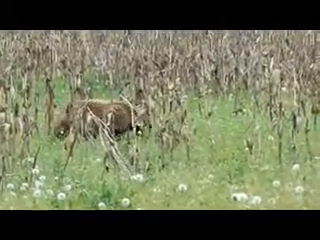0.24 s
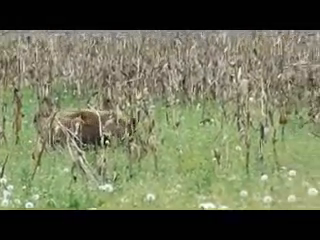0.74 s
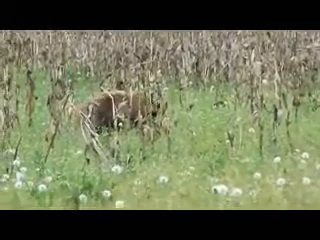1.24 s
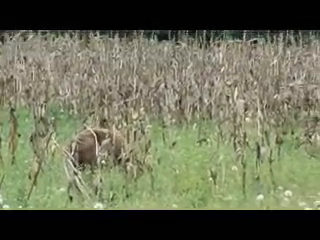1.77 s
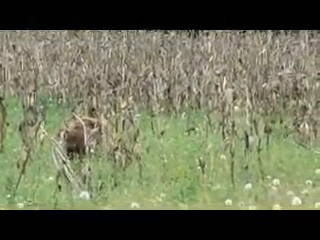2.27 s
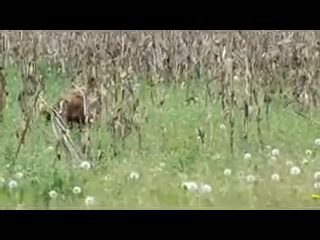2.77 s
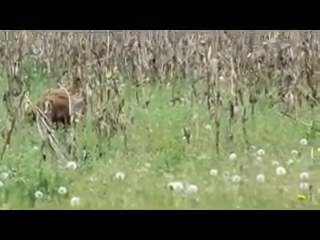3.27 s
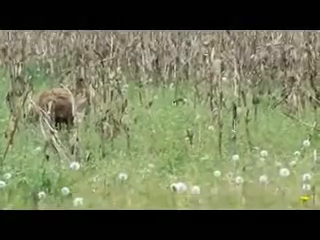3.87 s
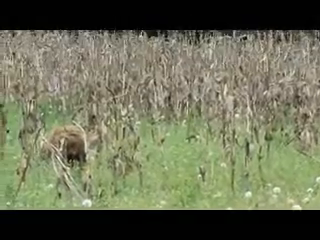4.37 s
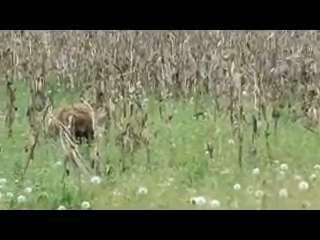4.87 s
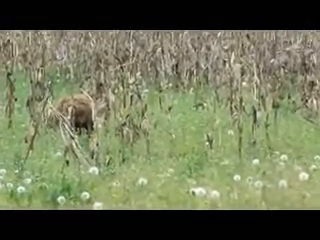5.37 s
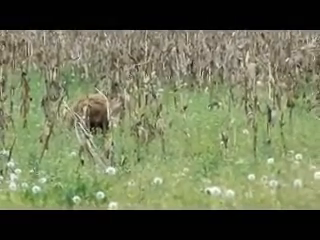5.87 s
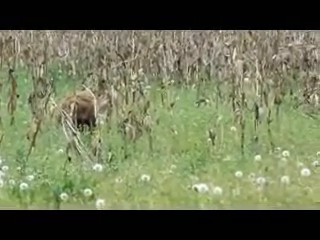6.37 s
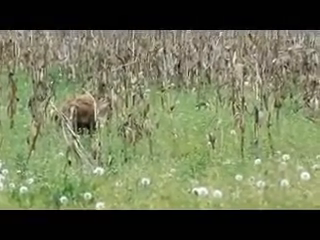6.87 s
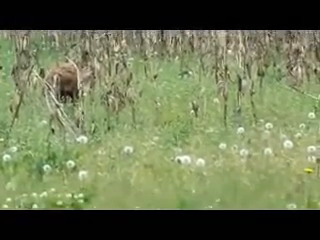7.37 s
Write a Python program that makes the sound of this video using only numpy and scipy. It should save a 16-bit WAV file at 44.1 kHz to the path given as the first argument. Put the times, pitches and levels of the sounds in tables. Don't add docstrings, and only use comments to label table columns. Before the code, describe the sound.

Outdoors beside a dry crop field, two far engines drone low while leaves rustle under a steady hiss. A cricket gives two early chirps, pauses, then chirps regularly, each a quick burst of three bright falling pulses. Wind puffs thump the handheld stereo microphone, hardest around three and a half to four seconds. Thin bird whistles come from far off.

```python
import sys
import numpy as np
from scipy import signal
from scipy.fft import rfft, irfft, next_fast_len
from scipy.io import wavfile
from scipy.ndimage import uniform_filter1d, map_coordinates

SR = 44100
rng = np.random.default_rng(int(sys.argv[2]) if len(sys.argv) > 2 else 0)


def put_to_file(sound):
    columns = np.atleast_2d(sound).T
    safe = np.clip(columns, -1, 1)
    whole_steps = np.round(safe * 32767)
    wavfile.write(sys.argv[1], SR, whole_steps.astype(np.int16))


def nominal_scale(level):
    x = np.asarray(level, float) / 20
    return 10 ** x


N = 336042


def unit(x):
    return x / np.sqrt(np.mean(x ** 2) + 1e-20)


def along(points, hz):
    f, v = np.transpose(points)
    return np.interp(np.log(hz + 1), np.log(f + 1), v)


def curves(rows, t=None):
    s, *columns = np.transpose(rows)
    if t is None:
        t = np.arange(N) / SR
    return [np.interp(t, s, column) for column in columns]


def wobble(rate_hz):
    at = np.arange(0, N + 32, 32)
    knots = rng.standard_normal(int(N * rate_hz / SR) + 4)
    return np.interp(np.arange(N), at, map_coordinates(knots, [at * rate_hz / SR]))


def filtered(x, response):
    m = next_fast_len(N + 8192)
    return irfft(rfft(x, m) * response(np.fft.rfftfreq(m, 1 / SR)), m)[..., :N]


def coloured(shape, points):
    return filtered(rng.standard_normal(shape), lambda hz: nominal_scale(along(points, hz)))


def add(track, start_s, sound):
    part = track[round(start_s * SR):][:len(sound)]
    part += sound[:len(part)]


def smooth_patches(shape, bands, frames):
    noise = uniform_filter1d(rng.standard_normal(shape), size=bands, axis=0)
    return unit(uniform_filter1d(noise, size=frames, axis=1))


def patchy(x, depth_db):
    z = signal.stft(x, nperseg=512)[2]
    gain_db = depth_db * smooth_patches(z.shape[1:], bands=6, frames=30)
    return signal.istft(z * nominal_scale(gain_db), nperseg=512)[1][..., :N]


def whistle(rows, squeeze=1, detune=1, octave_db=-80):
    t = np.arange(rows[0][0], rows[-1][0], squeeze / SR)
    hz, db = curves(rows, t)
    phase = 2 * np.pi * (np.cumsum(hz * detune) / SR + rng.random())
    fade = np.minimum(1, np.minimum(t - t[0], t[-1] - t) / 0.00084)
    return t[0] / squeeze, nominal_scale(db) * fade * (np.sin(phase) + nominal_scale(octave_db) * np.sin(2 * phase))


def scattered(x):
    t60_s, echo_db = .1, -16
    t = np.arange(SR // 8) / SR
    tail = rng.standard_normal(len(t)) * nominal_scale(-60 * t / t60_s) * (t > .004)
    return x + nominal_scale(echo_db) * signal.oaconvolve(x, tail / np.linalg.norm(tail))[:N]


# start_s, rustle_db
BREEZE = [(0.0, -44), (.1, -45.5), (1.9, -46), (2.2, -45), (2.5, -46.5), (2.85, -45.5), (3.2, -46),
          (3.8, -46), (4.2, -45.5), (4.6, -45), (6.3, -44), (7.62, -44.5)]
# freq_hz, level_db (per Hz)
RUSTLE_COLOUR = [(200, -17), (420, -11), (650, -9.5), (1000, -8), (1400, -9), (2200, -14.5), (3500, -17),
                 (4500, -21.5), (6000, -33), (9900, -120)]
# freq_hz, level_db (per Hz)
HISS_COLOUR = [(2500, -25), (3500, -16), (4500, -4), (5500, -2.5), (6500, -5), (8000, -6), (11500, -8.5),
               (13000, -20)]
# freq_hz, likeness (0 to 1)
RUSTLE_LIKENESS = [(200, .49), (800, .7), (1200, .45), (1600, .6), (2200, .36), (2600, .23), (3600, .18),
                   (4500, .3)]
# freq_hz, lead_rad
LEFT_LEAD = [(500, .1), (1200, .1), (1550, .35), (2240, .62), (2600, 1.16), (3300, 1.2), (3700, .7),
             (4200, .2)]


def field():
    breeze_db, = curves(BREEZE)
    spread = lambda hz: np.arccos(np.clip(along(RUSTLE_LIKENESS, hz), -1, 1)) / 2
    mid, side = filtered(
        rng.standard_normal((2, N)),
        lambda hz: nominal_scale(along(RUSTLE_COLOUR, hz)) * [np.cos(spread(hz)), np.sin(spread(hz))])
    pair = np.array([mid + side, mid - side])
    pair = filtered(pair, lambda hz: np.exp(.5j * along(LEFT_LEAD, hz) * [[1], [-1]]))
    rustle = unit(patchy(pair, depth_db=0.82)) * nominal_scale([[-.4], [.4]])
    mid, side = coloured((2, N), HISS_COLOUR)
    side = nominal_scale(-3.5) * side
    hiss = unit(np.array([mid + side, mid - side]))
    hiss_db = -11.5 + 4
    return (nominal_scale(breeze_db + 3.0 + 0.22 * wobble(7)) * rustle
            + nominal_scale(breeze_db + hiss_db + 0.16 * wobble(12.0)) * hiss)


# start_s, level_db
MURMUR_SWELL = [(0, -42), (.5, -58.5), (1, -50.5), (1.4, -43.5), (1.9, -47.5), (2.4, -50.5), (2.75, -43),
                (3.1, -48), (4.3, -50), (4.9, -54), (5.5, -56), (6, -41), (6.4, -55), (7.1, -49.5),
                (7.62, -49.5)]
# freq_hz, level_db (per Hz)
MURMUR_COLOUR = [(60, -30), (190, -8.5), (300, 5.5), (500, -7), (900, -7), (1500, -49)]


def murmur():
    mid, side = coloured((2, N), MURMUR_COLOUR)
    roar = unit(np.array([mid + 0.077 * side, mid - 0.097 * side]))
    return nominal_scale(curves(MURMUR_SWELL)[0] + 2.2 * wobble(8)) * roar


def engine(firing_hz, db, orders, sway_db):
    phase = 2 * np.pi * np.cumsum(firing_hz * (1 + 0.0018 * wobble(2.993))) / SR
    drone = np.zeros(N)
    for order, order_db in orders:
        level = nominal_scale(db + 2.0 + order_db + sway_db * wobble(7))
        drone += level * np.sin(order * phase + 2 * np.pi * rng.random())
    return drone


# start_s, firing_hz, level_db
FAR_ENGINE = [(0, 24.3, -18), (.8, 23.66, -18.5), (1.3, 23.32, -18), (1.6, 23.1, -18), (2.1, 22.7, -21.5),
              (2.75, 22.28, -26.5), (3.6, 21.6, -27), (4.55, 21.12, -29), (5.1, 21.02, -29),
              (5.5, 21.02, -28), (6.3, 20.96, -30.5), (6.8, 20.8, -30), (7.62, 20.58, -31.5)]
# order (multiple of firing rate), level_db
FAR_ENGINE_ORDERS = [(2, -18), (3, -18.5), (4, -19.5), (5, 0), (6, -7), (7, -21.5), (8, -21.5), (9, -30.5),
                     (10, -29.5), (12, -35.5)]
# start_s, firing_hz, level_db, growl_db (extra on orders 3 and 4)
STEADY_ENGINE = [(0, 30.7, -34.5, -28), (.8, 30.29, -27.5, -17), (1.3, 30.2, -28.5, -24),
                 (1.6, 29.93, -27, 16), (2.75, 29.4, -27.5, 9.5), (3.6, 28.89, -27, 9.5),
                 (4.55, 28.41, -28, 3), (5.1, 28.25, -30, 10), (5.5, 28.04, -30.5, 8),
                 (6.3, 28.49, -30.5, 6), (6.8, 28.89, -32.5, 14), (7.62, 29.48, -34.5, 3)]
# order (multiple of firing rate), level_db
STEADY_ENGINE_ORDERS = [(2, -5.5), (3, -18), (4, -12.5), (5, 1), (6, -6), (7, -15.5), (8, -17), (9, -25),
                        (10, -24)]


def engines():
    far = engine(*curves(FAR_ENGINE), FAR_ENGINE_ORDERS, sway_db=1.1)
    hz, db, growl_db = curves(STEADY_ENGINE)
    orders = [(k, level + growl_db * (k in (3, 4))) for k, level in STEADY_ENGINE_ORDERS]
    near = engine(hz, db, orders, sway_db=1.6)
    return far * nominal_scale([[-.6], [.6]]) + near * nominal_scale([[-.8], [.8]])


def steady(x, size):
    return x / np.sqrt(np.abs(uniform_filter1d(x ** 2, size)) + 0.018)


# freq_hz, level_db (per Hz)
BUFFET_COLOUR = [(15, -11), (30, -1.5), (60, 3.5), (110, -1.5), (180, -12.5), (300, -25), (500, -43),
                 (900, -88)]
# freq_hz, level_db (per Hz)
THUMP_COLOUR = [(20, -17), (60, 2.5), (110, 2), (170, 6), (250, -3), (400, -16), (600, -36.5), (900, -73)]
# freq_hz, level_db (per Hz)
SNAP_COLOUR = [(200, -30), (350, 0), (600, 0), (800, -8), (1000, -22), (1300, -50), (2000, -90)]


def port(gust_db, thumps):
    snap_part_db, fizz_part_db, spike_part_db = -1, -13, 15
    lumps = steady(nominal_scale(5.2 * wobble(18)) * unit(coloured(N, BUFFET_COLOUR)), size=6000)
    dull, bright, spikes = np.zeros((3, N))
    t = np.arange(-1500, 1500) / SR
    snap = irfft(nominal_scale(along(SNAP_COLOUR, np.fft.rfftfreq(len(t), 1 / SR))), len(t))
    snap = np.fft.fftshift(snap)
    suction = .2 * np.exp(-(t / .0045) ** 2) - np.exp(-(t / .0009) ** 2)
    spike = nominal_scale(spike_part_db) * suction - nominal_scale(snap_part_db) * snap / snap.max()
    for s, db, bright_db in thumps:
        add(dull, s + t[0], nominal_scale(db + 4.5) * np.exp(-(t / 0.01) ** 2))
        add(bright, s + t[0], nominal_scale(db + bright_db + fizz_part_db) * np.exp(-(t / 0.0065) ** 2))
        add(spikes, s + t[0], nominal_scale(db + bright_db) * spike)
    body = dull * steady(unit(coloured(N, THUMP_COLOUR)), size=500)
    fizz = bright * steady(unit(coloured(N, SNAP_COLOUR)), size=300)
    return nominal_scale(gust_db + 1.53) * lumps + body + fizz + spikes


# peak_s, left_db, right_db
WIND_PUFFS = [(0.05, -22.5, -36), (0.18, -34, -22.5), (0.93, -39, -42), (1.8, -34, -20.5),
              (2.06, -23, -19.5), (2.19, -21, -16), (2.33, -33, -17.5), (2.46, -23, -24.5),
              (2.66, -28, -41), (3.08, -30, -18), (3.2, -24, -20.5), (3.45, -24, -13), (3.68, -37, -12.5),
              (3.82, -26, -21), (3.95, -37, -13), (4.08, -27, -22), (4.78, -24.5, -25.5), (5.08, -26, -26),
              (5.42, -19.5, -35), (5.81, -16.5, -16.5), (6.17, -18.5, -23.5), (6.33, -21.5, -21.5),
              (6.47, -23, -27.5), (6.68, -23, -24), (7.1, -27, -22.5), (7.28, -20, -30), (7.56, -21.5, -23)]
# peak_s, level_db, brightness_db
LEFT_EDDIES = [(2.129, -35, -24), (2.146, -25, -18), (2.446, -36, -26), (3.075, -25, 3), (3.094, -38, -6),
               (3.107, -21, 3), (3.114, -29, -5), (3.856, -40, -18), (3.866, -23, -17), (3.869, -14, -6),
               (3.885, -14, -16), (3.888, -16.5, -13), (3.898, -11.5, -9), (4.005, -18.5, -10),
               (4.847, -33, -26), (5.026, -28.5, -29), (5.413, -28, -20), (5.669, -24, -31),
               (5.783, -19, -27), (6.144, -38, 0), (6.737, -29.5, -23), (7.607, -22, -29)]
# peak_s, level_db, brightness_db
RIGHT_EDDIES = [(1.682, -26, -22), (1.817, -24.5, -14), (1.991, -22, -7), (2.018, -24, -26),
                (2.042, -18, -29), (2.164, -19.5, -20), (2.193, -16, -12), (2.211, -15, -16),
                (2.308, -18.5, -12), (3.077, -21, -9), (3.105, -18, -15), (3.177, -14.5, -14),
                (3.387, -18.5, -26), (3.405, -27, -25), (3.468, -14, -2), (3.529, -20.5, -26),
                (3.573, -26.5, -23), (3.63, -13, -2.5), (3.641, -14.5, -9), (3.676, -26, -24),
                (3.705, -17, -27), (3.722, -18, -20), (3.788, -26.5, -3), (3.853, -19, -10),
                (3.879, -10, -6), (3.896, -13, -25), (3.912, -11, -32), (4.035, -12.5, -14),
                (4.04, -14.5, -20), (4.048, -16.5, -7), (4.062, -24, -14), (4.089, -30, -8),
                (4.167, -22.5, -25)]


def wind():
    rise_db_s, fall_db_s, calm_db = 78, 73, -45
    peak_s, *port_levels_db = np.transpose(WIND_PUFFS)
    late_s = np.arange(0, N, 64)[:, None] / SR - peak_s
    shape_db = np.minimum(rise_db_s * late_s, -fall_db_s * late_s)
    gusts_db = []
    for db in port_levels_db:
        loudest_db = np.maximum(calm_db, (shape_db + db).max(1))
        gusts_db.append(np.repeat(loudest_db, 64)[:N])
    return np.array([port(gusts_db[0], LEFT_EDDIES), port(gusts_db[1], RIGHT_EDDIES)])


# start_s, level_db
STALK_TICKS = [(4.138, -44), (4.91, -40), (5.548, -31), (7.136, -45), (7.428, -45)]


def ticks():
    track, t = np.zeros(N), np.arange(200) / SR
    for s, db in STALK_TICKS:
        add(track, s, nominal_scale(db - 60 * t / 0.0073) * rng.standard_normal(len(t)))
    return filtered(track, lambda hz: hz ** 2 / (hz ** 2 + 3500 ** 2))


# start_s, length_s, from_hz, to_hz, level_db
BIRD_GLIDES = [(0.328, .035, 3400, 3420, -57), (.4, .16, 3530, 3830, -56), (.57, .1, 3860, 4020, -59),
               (.58, 0.56, 512, 510, -55.5), (.385, .07, 2630, 2680, -59), (.5, .13, 2790, 2950, -54.5),
               (.935, .065, 3540, 3740, -56), (1.0, .07, 3760, 4050, -60), (3.657, .022, 3100, 3050, -54),
               (3.95, .03, 4600, 3970, -53), (4.52, 0.027, 2900, 3900, -58), (4.55, .04, 6050, 6580, -58),
               (4.718, .037, 6300, 6720, -48), (4.91, .04, 3000, 3300, -56), (4.985, .03, 3900, 4650, -57),
               (5.008, .03, 4600, 5050, -53), (5.052, .014, 6700, 5700, -50),
               (5.066, .012, 5000, 4200, -57), (5.825, .035, 3650, 3280, -54),
               (5.87, .025, 4760, 4600, -52), (5.866, 0.027, 3020, 2840, -53),
               (5.925, .045, 3300, 3650, -54), (5.97, .035, 3640, 3720, -57), (5.94, .02, 5650, 5100, -53),
               (6.19, .03, 4950, 3950, -53.5), (6.322, 0.033, 4900, 4150, -54),
               (6.083, .025, 4700, 4150, -56), (6.378, 0.026, 2870, 2950, -53),
               (6.545, .04, 5200, 4150, -57), (7.5, .05, 3850, 4000, -56), (7.448, 0.12, 2740, 3000, -56),
               (7.452, .028, 3610, 3730, -53), (7.4, .04, 3500, 3580, -56)]
# offset_s (from its lowest point), pitch_hz, level_db
SWOOP_SHAPE = [(-.103, 5850, -13), (-.082, 6250, -6), (-.066, 6400, 3), (-.057, 5800, -6),
               (-.022, 4050, -2), (0, 3230, -11), (.013, 4150, 0), (.028, 5100, -5), (.037, 5500, -14)]
# lowest_s, level_db, crest_db (extra on the high crest)
BIRD_SWOOPS = [(5.244, -49, 1), (5.432, -48, 1.5), (5.615, -51.5, -6)]


def birds():
    glides, swoops = np.zeros((2, N))
    swell = [(0, -7), (.35, 0), (1 - .35, 0), (1, -7)]
    for s, length, from_hz, to_hz, db in BIRD_GLIDES:
        rows = [(s + u * length, from_hz + u * (to_hz - from_hz), db + less_db) for u, less_db in swell]
        add(glides, *whistle(rows))
    for s, db, crest_db in BIRD_SWOOPS:
        rows = [(u, hz, less_db + crest_db * (hz > 5800)) for u, hz, less_db in SWOOP_SHAPE]
        start, tone = whistle(rows)
        add(swoops, s + start, nominal_scale(db) * tone)
    return glides * nominal_scale(3 + 1.9 * wobble(70)) + swoops * nominal_scale(3 + 1.9 * wobble(140))


# offset_s (from peak), pitch_hz, level_db
OPENING_STROKE = [(-.007, 5750, -20), (-.004, 5620, -2), (0, 5450, 0), (.004, 5200, 0), (.007, 4950, -18)]
# offset_s (from peak), pitch_hz, level_db
LOUD_STROKE = [(-.015, 5570, -38), (-.0105, 5704, -9.5), (-.006, 5730, -3), (-.002, 5720, -1),
               (0, 5730, -0.5), (.002, 5560, -3), (.0048, 5300, -7), (.0085, 4960, -14.5),
               (.012, 4660, -33)]
# peak_s, level_db
CHIRP_OPENINGS = [(.381, -42), (.831, -48), (2.119, -53), (2.517, -57), (2.813, -39), (3.135, -48),
                  (3.456, -45), (3.691, -50), (3.918, -51), (4.389, -50), (4.624, -49), (4.85, -43),
                  (5.252, -44), (5.466, -47), (5.712, -43), (6.065, -43), (6.351, -43), (6.568, -46),
                  (6.83, -42), (7.033, -44), (7.332, -43), (7.579, -46)]
# onset_s, peak_db, length_s, tail_db (under the peak)
CHIRP_STROKES = [(0.4003, -34.5, 0.0097, -2.2), (0.434, -31, 0.014, -9.5), (0.4683, -30.5, 0.0151, -11.3),
                 (0.85, -34.7, 0.0136, -9.3), (0.8822, -34.1, 0.01, -7.0), (0.918, -34.1, 0.014, -8.0),
                 (2.14, -34, 0.012, -6.5), (2.1689, -33.5, 0.012, -4.6), (2.2054, -32.5, 0.0141, -7),
                 (2.5368, -35.6, 0.0144, -9.3), (2.5688, -33, 0.013, -11.4), (2.6031, -33.0, 0.016, -13.6),
                 (2.8305, -32, 0.011, -3.2), (2.8663, -29, 0.012, -8), (2.9005, -32.1, 0.015, -8.5),
                 (3.1554, -34.5, 0.0111, -12.7), (3.1878, -35, 0.0106, -6.4), (3.2236, -34.5, 0.0101, -6.9),
                 (3.4742, -39.0, 0.0144, -4), (3.5085, -35.7, 0.0102, -4.9), (3.5441, -36, 0.015, -10.0),
                 (3.7089, -37.5, 0.013, -5), (3.7433, -33, 0.011, -10.1), (3.778, -32.5, 0.014, -12.4),
                 (3.937, -35, 0.0129, -12.6), (3.9702, -35, 0.012, -5), (4.0076, -33.5, 0.014, -14),
                 (4.4066, -37.4, 0.0153, -7.7), (4.4411, -35.5, 0.014, -14.3), (4.4756, -35.6, 0.015, -11.9),
                (4.644, -35.6, 0.0132, -8.2), (4.6754, -34, 0.0154, -8.4), (4.7109, -33.5, 0.0152, -10.3),
                (4.8672, -35, 0.015, -9), (4.8998, -34, 0.011, -11.1), (4.937, -33.9, 0.0148, -8.0),
                (5.271, -33.2, 0.014, -8), (5.3035, -32.5, 0.0137, -9), (5.34, -31, 0.015, -8.8),
                (5.4836, -31.5, 0.013, -12.1), (5.5155, -32.6, 0.0117, -6.1), (5.555, -31.5, 0.013, -6.8),
                (5.7318, -30.5, 0.013, -9.4), (5.7634, -30, 0.0162, -12), (5.8, -31.5, 0.016, -13),
                (6.0836, -37.5, 0.0135, -4.9), (6.1167, -32.0, 0.011, -4.1), (6.1515, -31.5, 0.0153, -8),
                (6.3713, -34, 0.013, -6), (6.4041, -32.5, 0.015, -9.8), (6.44, -33.8, 0.015, -8.6),
                (6.5868, -32, 0.015, -10), (6.6199, -31, 0.0144, -9.0), (6.655, -31, 0.016, -10),
                (6.8479, -31, 0.016, -8.2), (6.883, -30, 0.013, -9.5), (6.9179, -30.8, 0.016, -13),
                (7.0514, -33, 0.014, -10.3), (7.0859, -30.0, 0.013, -13.2), (7.1201, -29, 0.016, -14.6),
                (7.3516, -31.5, 0.013, -9.8), (7.3841, -31.5, 0.0144, -11.2),
                (7.4201, -32.1, 0.0148, -12.1), (7.5962, -35, 0.015, -6.9)]


def cricket():
    model_onset_s, model_length_s, model_tail_db = -.0095, 0.015, -10
    song = np.zeros(N)
    for (s, db), tune in zip(CHIRP_OPENINGS, rng.standard_normal(len(CHIRP_OPENINGS))):
        start, tone = whistle(OPENING_STROKE, 0.89, 1 + 0.006 * tune)
        add(song, s + start, nominal_scale(db) * tone)
    strokes = CHIRP_STROKES
    for (s, db, length, tail_db), tune in zip(strokes, rng.standard_normal(len(strokes))):
        more_db = np.clip(tail_db - model_tail_db, -7, 6)
        rows = [(u, hz, less_db + more_db * (u > .003)) for u, hz, less_db in LOUD_STROKE]
        squeeze = model_length_s / np.clip(length, .008, .02)
        start, tone = whistle(rows, squeeze, 1 + 0.0027 * tune, octave_db=-24)
        add(song, s - model_onset_s / squeeze + start, nominal_scale(db) * tone)
    return song * nominal_scale(1.4 * wobble(250))


def scene():
    return field() + murmur() + engines() + wind() + ticks() + scattered(birds() + cricket())


# from_s, to_s, share (of the bands)
APART_SPANS = [(1.96, 2.05, .3), (2.15, 2.2, .35), (2.2, 2.26, 1), (2.47, 2.51, .25), (2.93, 3.0, 1),
               (3.11, 3.21, .35), (3.41, 3.48, 1), (3.49, 3.58, .2), (3.58, 3.8, 1), (3.86, 3.9, .25),
               (3.92, 4.08, 1), (5.54, 5.61, 1), (6.08, 6.11, .3), (6.11, 6.14, 1), (6.33, 6.46, .8),
               (6.57, 6.63, .8), (7.45, 7.5, .3), (7.53, 7.7, .35)]
# from_s, to_s, from_hz, to_hz
APART_BANDS = [(.13, .18, 5700, 5950), (.27, .3, 7500, 9000), (.5, .6, 4600, 4900),
               (.53, .56, 10300, 11700), (1.02, 1.11, 4800, 5050), (1.45, 1.5, 4000, 5500),
               (3.27, 3.3, 7000, 8500), (5.15, 5.52, 4600, 4950), (5.27, 5.33, 4300, 8200),
               (5.92, 5.95, 9600, 11000)]


def kept_apart(hz, t):
    lots = rng.random((65, len(t) // 2 + 1))
    lots = np.repeat(np.repeat(lots, 8, 0), 2, 1)[:len(hz), :len(t)]
    apart = lots < sum(share * ((t > a) & (t < b)) for a, b, share in APART_SPANS)
    for a, b, lo_hz, hi_hz in APART_BANDS:
        apart |= np.outer((hz > lo_hz) & (hz < hi_hz), (t > a) & (t < b))
    return apart


def starved(z, hz, apart):
    chirp = uniform_filter1d(np.abs(z[0, (hz > 5500) & (hz < 5900)]).max(0), size=6)
    patches = nominal_scale(5 * smooth_patches(z.shape[1:], bands=4, frames=8))
    reach = [(5990, -90), (6010, 0), (6350, -2), (6600, -10), (7800, -13), (10000, -30)]  # Hz, dB
    masked = chirp * patches * nominal_scale(5 * apart - 3) * nominal_scale(along(reach, hz))[:, None]
    return z * np.where((masked > nominal_scale(-55)) & (np.abs(z) < nominal_scale(-64)), nominal_scale(-22), 1)


# start_s, limit_hz
BAND_LIMIT = [(0.1, 11900), (0.9, 12400), (1.7, 12500), (2.5, 11950), (3.7, 11430), (4.9, 11460),
              (6.1, 12300), (6.3, 11850), (7.3, 12300)]


def band_limited(z, hz, t):
    return z * (hz[:, None] < curves(BAND_LIMIT, t)[0])


def top_cut(x):
    return signal.sosfilt(signal.butter(12, 12250, fs=SR, output="sos"), x)


def record(dry):
    hz, t, z = signal.stft(dry, SR, nperseg=1024)
    apart = kept_apart(hz, t)
    treble = hz[:, None] > 4000
    z[1] = np.where(treble & ~apart, z[0], z[1])
    z *= nominal_scale(-0.5 * (apart & treble))
    z = band_limited(starved(z, hz, apart), hz, t)
    passed = signal.istft(z, SR, nperseg=1024)[1][:, :N]
    clipped = passed / (1 + np.abs(passed) ** 12) ** (1 / 12)
    return top_cut(clipped)


dry = scene()
out = record(dry)
put_to_file(out)
```